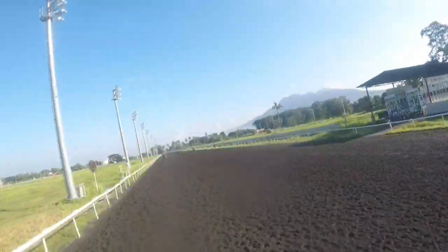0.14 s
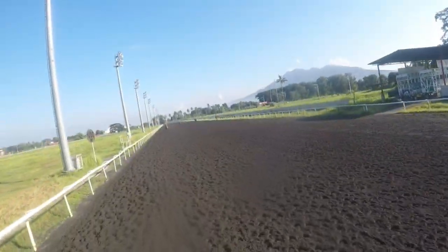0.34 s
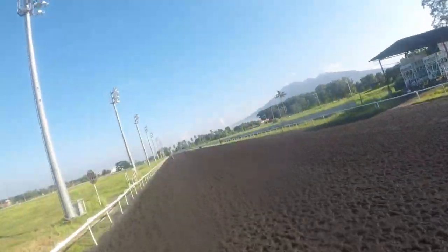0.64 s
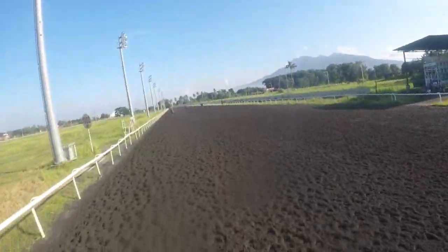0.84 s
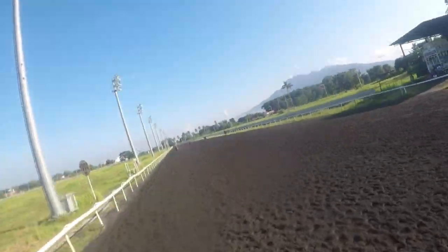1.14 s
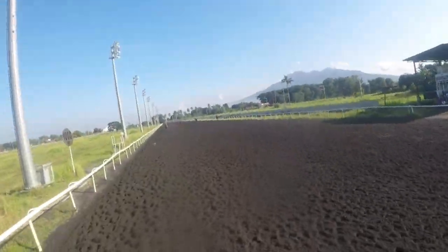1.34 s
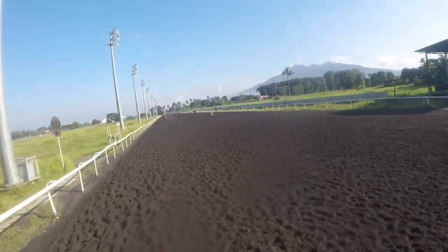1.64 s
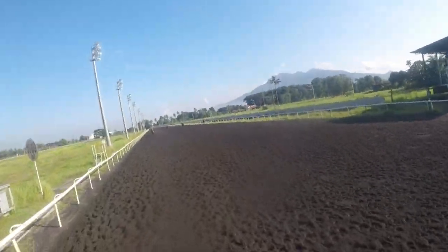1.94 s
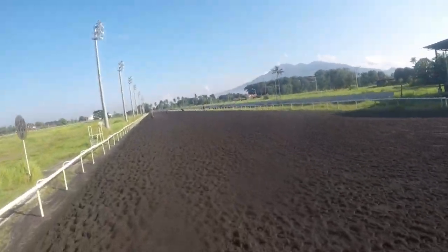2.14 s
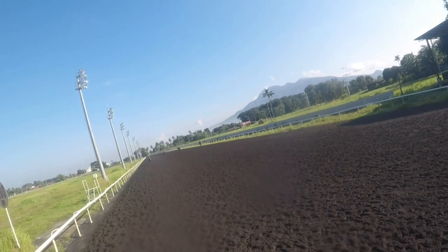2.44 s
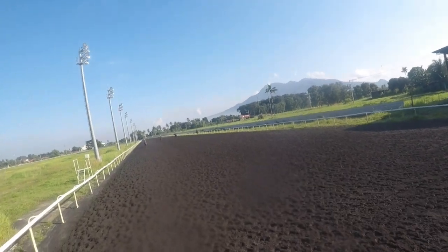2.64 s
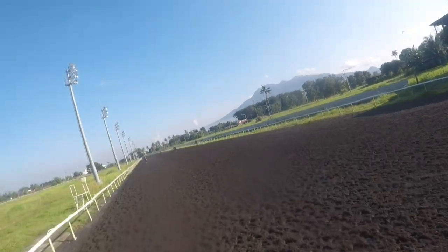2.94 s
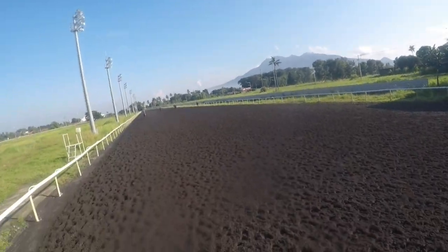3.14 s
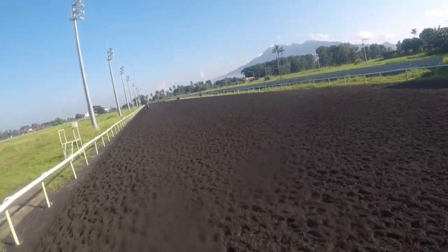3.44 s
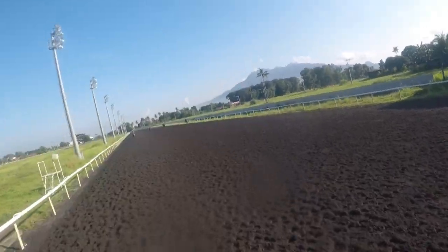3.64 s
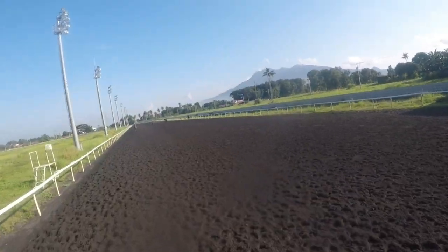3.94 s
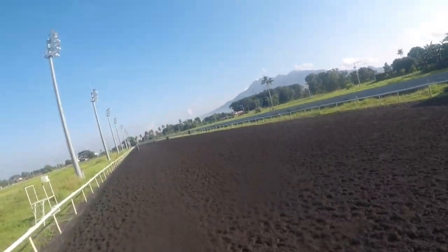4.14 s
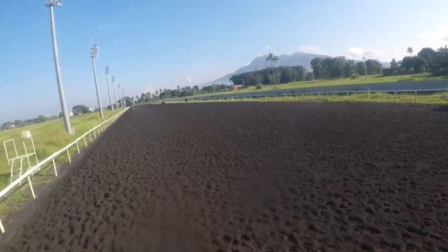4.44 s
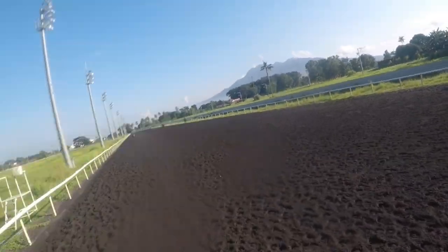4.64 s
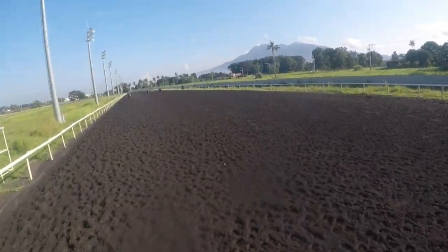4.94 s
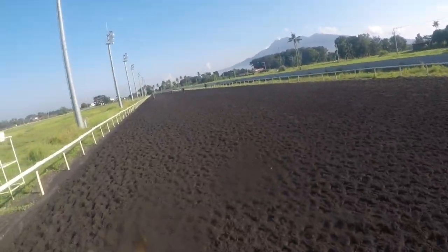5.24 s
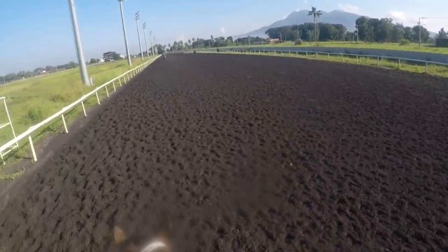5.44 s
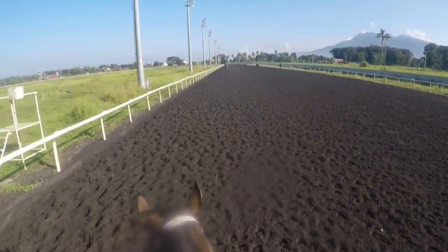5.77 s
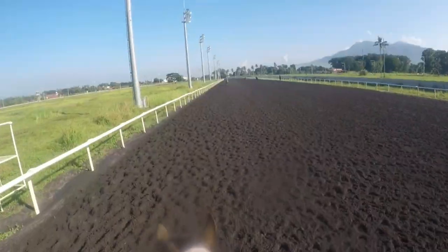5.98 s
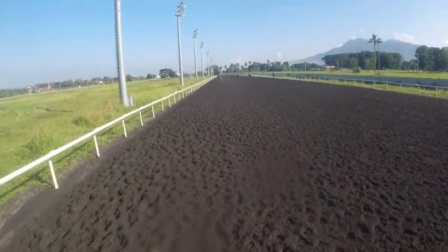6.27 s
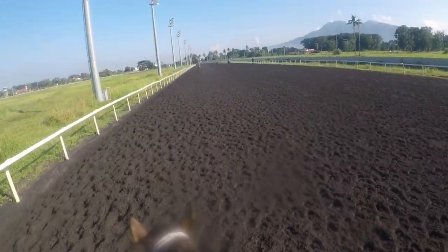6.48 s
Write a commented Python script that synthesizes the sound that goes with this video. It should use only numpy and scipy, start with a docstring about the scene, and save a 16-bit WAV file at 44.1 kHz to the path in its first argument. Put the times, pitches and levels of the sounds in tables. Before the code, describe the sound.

A rider's loose camera mount knocks and clacks once per galloping stride, over rushing, buffeting wind and faint dull hoof thuds on soft dirt.

```python
"""Hard clacks over a galloping rush of air: a loose camera mount on a racehorse's rider lurches once a stride.
Each lurch chains sway, grit, bump and judder, narrow tones swelling into the clack, clack, housing ring,
settling rattle and wobble, made from shaped impulses, random grains, resonances and swept sines.
Between them come light taps, small bright clicks, dull hoof thuds on soft dirt (filtered grains)
and wind on the microphone (filtered noise); a slow limiter ducks the mix after loud knocks."""
import sys
import numpy as np
from scipy import signal
from scipy.io import wavfile
from scipy.ndimage import uniform_filter1d, minimum_filter1d, map_coordinates

SR = 44100
rng = np.random.default_rng(int(sys.argv[2]) if len(sys.argv) > 2 else 0)


def wrap_up_sound(samples):
    """Save the sound to the file named by the first command line argument, as 16-bit audio."""
    columns = np.atleast_2d(samples).T
    # keep every value between -1 and 1, then stretch to whole-number steps
    tamed = np.clip(columns, -1, 1)
    steps = np.round(tamed * 32767).astype(np.int16)
    wavfile.write(sys.argv[1], SR, steps)


N = 291501
TIME_S = np.arange(N) / SR

# mount lurches, one a stride: bump_s, clack_s, sway_db, bump_db, judder_db, judder_hz,
# clack_force_db, low_tone_hz, wobble_db
LURCHES = [(0.0281, .0593, -9.5, -13, -11, 126.2, 1.5, 1524, -1.5),
           (0.5828, .622, -14, -19.5, -14, 149.4, -2, 1508, -8),
           (1.1804, 1.2149, -14.5, -14.5, -18.5, 116.4, 2.5, 1461, 0.5),
           (1.754, 1.7882, -17, -18.5, -12.5, 152.6, -1, 1502, -11),
           (2.3525, 2.386, -17, -16.5, -11.5, 123.2, 2, 1460, -5),
           (2.947, 2.9838, -11.5, -12, -11, 105.1, 5, 1506, 2.5),
           (3.5376, 3.5748, -16, -16.5, -16, 149.9, 1.5, 1509, -0.5),
           (4.1153, 4.1517, -19.5, -14.5, -8, 137.5, .5, 1514, -5.5),
           (4.7022, 4.735, -14.5, -15.5, -8, 150.1, 1, 1465, -1.5),
           (5.292, 5.3237, -20, -19, -17.5, 164.7, -3, 1502, -10.5),
           (5.6987, 5.7278, -14, -28.5, -13.5, 143.7, -3.5, 1559, -8.5),
           (5.9236, 5.962, -12, -17, -11.5, 143.1, 0.5, 1484, -5)]
# spectrum of the soft knock: hz, relative_db
KNOCK_SPECTRUM = [(40, -7.5), (150, -0.5), (280, 0.5), (420, -7), (560, -4), (720, -18), (1000, -18.5),
                  (1250, -26), (1600, -20), (1900, -28.5), (2400, -39.5), (4000, -79.5)]
# spectrum of the gritty joint: hz, relative_db
GRIT_SPECTRUM = [(600, -13), (1600, 13.5), (2200, -3.5), (2800, 1), (3550, -13.5), (4150, -3),
                 (5100, -16.5), (6000, -16.5), (7000, -21.5), (9500, -26.5), (12000, -46), (16000, -58)]


def amp(db):
    """Decibels to amplitude gain."""
    return 10 ** (np.asarray(db) / 20)


def leveled(x, db, seconds):
    """Scales x so that its energy, spread over this many seconds, has the level db."""
    return x * amp(db) * np.sqrt(seconds * SR / (np.sum(x ** 2) + 1e-20))


def add(mix, start_s, sound):
    """Mixes a sound in at start_s, cropped to the mix."""
    start = round(start_s * SR)
    sound = sound[max(-start, 0):]
    part = mix[max(start, 0):][:len(sound)]
    part += sound[:len(part)]


def colour(x, points, tilt_db_per_octave=0, size=4096):
    """Minimum-phase filter with the given spectrum, tilted."""
    hz, db = np.transpose(points)
    octave = np.log2(abs(np.fft.fftfreq(size, 1 / SR)) + 1)
    gain_db = np.interp(octave, np.log2(hz), db) + tilt_db_per_octave * octave
    log_gain = np.log(amp(gain_db))
    # the Hilbert transform of the log gain gives the causal phase
    impulse_response = np.fft.ifft(np.exp(np.conj(signal.hilbert(log_gain)))).real
    return signal.fftconvolve(x, impulse_response)[:len(x)]


def resonate(x, hz, width_hz):
    """Two equal resonances in series: a peak with steep skirts."""
    b, a = signal.iirpeak(hz, hz / width_hz, SR)
    return signal.lfilter(b, a, signal.lfilter(b, a, x))


def wander(rate_hz, count):
    """Smooth random curve through unit-spread knots, rate_hz knots a second."""
    knots = rng.standard_normal(8192)
    return map_coordinates(knots, [np.arange(count) * rate_hz / SR], order=2, mode="wrap")


def grains(t, per_s, spread_db):
    """Random one-sample clicks of uneven size and random sign at the sample times t."""
    chance = rng.random(len(t))
    size = np.clip(rng.standard_normal(len(t)), -2, 2)
    sign = rng.choice([-1, 1], len(t))
    return (chance < per_s / SR) * sign * amp(spread_db * size)


def blow(count=12000):
    """One sharp contact: time axis and unit impulse."""
    t = np.arange(count) / SR
    return t, 1. * (t == 0)


def breeze(s):
    """Slow strength of the ride's rush at time s, in dB."""
    # wind strength: time_s, strength_db
    strength = [(0, 5.5), (.35, -3.5), (1.1, 0), (1.9, 0), (2.3, 1), (2.85, .5), (3.25, -1.5), (3.6, -1),
                (4.1, -2.5), (4.65, -1), (5.2, -0.3), (5.7, 0.5), (6.08, -5), (6.33, -7.5), (6.6, 1.5)]
    return np.interp(s, *np.transpose(strength))


def wind():
    """Air over the microphone: lumpy buffeting, low roar and fine hiss, swelling with the rider's swings."""
    # spectra: hz, relative_db
    buffet_spectrum = [(8, -0.5), (22, 2.5), (55, -4), (85, -4), (130, -23.5), (250, -47.5), (600, -77)]
    roar_spectrum = [(50, -12.5), (120, 1.5), (180, -2), (300, -2.5), (400, -7), (510, -7.5), (620, -11.5),
                     (780, -17), (1200, -26), (1600, -26), (2200, -38.5), (4000, -52.5)]
    hiss_spectrum = [(400, 2), (1500, 5), (2300, 1.5), (3050, 1.5), (3600, -9), (4200, -3.5), (6200, -6),
                     (6900, -8.5), (8000, -8), (9600, -6), (10600, -8), (11500, -14), (13000, -15),
                     (15500, -34)]
    # buffet, roar, hiss: rest_db, swing_db, breeze_db_per_db, flutter_db, drift_db
    air_layers = [(-46, 18.5, 0.9, 1.5, 1.5), (-52, 11.5, 1.07, 3, -0.36), (-64.5, 7.5, 0.68, 0.6, -0.23)]
    # lull and gust in the buffeting: centre_s, change_db, half_length_s
    gust_events = [(3.303, -9, 0.051), (6.556, 16.5, 0.083)]
    last_swing_s, swing_rise_s, swing_fall_s = 6.418, 0.14, 0.12

    # the rider swings forward into each lurch and once more at the end
    peaks_s = [stop_s for _, stop_s, *_ in LURCHES] + [last_swing_s]
    slopes = [np.minimum((TIME_S - s) / swing_rise_s, (s - TIME_S) / swing_fall_s) for s in peaks_s]
    swing = np.exp(np.max(slopes, axis=0))
    layers = []
    spectra = [buffet_spectrum, roar_spectrum, hiss_spectrum]
    for spectrum, (rest_db, swing_db, follow, flutter_db, drift_db) in zip(spectra, air_layers):
        unsteady_db = flutter_db * wander(35, N) + drift_db * wander(9, N)
        air = colour(rng.standard_normal(N), spectrum) * amp(unsteady_db)
        level_db = rest_db + swing_db * swing + follow * breeze(TIME_S)
        layers.append(leveled(air, level_db, N / SR))
    buffet, roar, hiss = layers
    gusts_db = sum(db * np.exp(-((TIME_S - s) / half_s) ** 2) for s, db, half_s in gust_events)
    return (buffet * amp(gusts_db) + roar + hiss) * signal.windows.tukey(N, .002)


def hooves():
    """Each hoof crushes loose clods: a dull cluster of grains; light footfalls follow the gait."""
    # heaviest falls: start_s, level_db, length_s, tilt_db_per_octave
    heavy = [(.207, -44, 0.04, -1.5), (.755, -52, 0.068, 2), (1.305, -43, 0.055, -1),
             (1.625, -46.5, 0.029, 0.5), (2.192, -45, .032, 1), (2.48, -48.5, .072, 1),
             (3.082, -38, 0.039, 0), (3.684, -42, 0.095, -1), (4.328, -49, 0.049, 2),
             (4.859, -39, 0.038, .5), (5.802, -46, 0.017, 3), (6.011, -42, 0.041, 2.5),
             (6.416, -44, 0.016, 2.5), (6.575, -44, 0.077, 1)]
    # light falls of every stride: delay_after_clack_s, level_db (before breeze), length_s
    gait = [(.11, -57, 0.12), (.175, -51, 0.021), (.4, -60, 0.032)]
    # dirt spectrum: hz, relative_db
    dirt_spectrum = [(60, -29.5), (180, 18), (300, -5.5), (420, 5), (510, 10.5), (640, -7.5), (800, -9.5),
                     (1200, -15.5), (1550, -11.5), (2200, -38.5), (4000, -36.5), (9000, -52)]
    jitter_s = 0.022

    out, t = np.zeros(N), np.arange(12000) / SR
    light = []
    for _, stop_s, *_ in LURCHES:
        for delay_s, db, length_s in gait:
            start_s = stop_s + delay_s + jitter_s * rng.standard_normal()
            light.append((start_s, db + breeze(stop_s + delay_s), length_s, 0))
    for start_s, db, length_s, tilt in [*heavy, *light]:
        pressure = (1 - np.exp(-t / 0.0025)) * np.exp(-(t / length_s) ** 2)
        crush = grains(t, 1500, 1.7) * pressure
        add(out, start_s, leveled(colour(crush, dirt_spectrum, tilt), db, 2.07 * length_s))
    return out


def bright_clicks():
    """Small bright clicks, most of them just before a bump of the mount: grains in one resonance."""
    # start_s, level_db, resonance_hz, t60_s
    events = [(0.578, -48, 5820, .01), (2.933, -56, 8000, .015), (4.1075, -45, 4340, .012),
              (4.692, -49.5, 4440, .011), (5.282, -57, 3040, .034), (5.389, -58, 4550, .046),
              (5.622, -54, 4500, .035)]
    out = np.zeros(N)
    for start_s, db, hz, t60_s in events:
        t, first = blow()
        contacts = first + grains(t, 4800, 5.5) * amp(-12.5 - 60 * t / t60_s)
        add(out, start_s, leveled(resonate(contacts, hz, 700) + 0.057 * contacts, db, 0.0031))
    return out


def housing(force):
    """The hollow case rings on after a force; random mode gains and detuning vary each blow."""
    # modes: hz, level_db, t60_s
    modes = [(388, -32.5, 0.15), (517.4, -22, 0.099), (679, -21, 0.048), (866, -29.5, 0.024),
             (1113, -34, 0.13), (1500, -29.5, 0.091), (1560, -22, 0.057), (1795, -28, 0.05),
             (2030, -46, .045), (3890, -45.5, 0.039)]
    t = np.arange(len(force)) / SR
    ring = np.zeros(len(force))
    for hz, db, t60_s in modes:
        luck, detune = rng.standard_normal(2)
        decay = amp(db + 3.6 * luck - 60 * t / t60_s)
        ring += decay * np.sin(2 * np.pi * hz * (1 + 0.013 * detune) * t)
    return signal.fftconvolve(force, ring)[:len(force)]


def taps():
    """Between lurches the mount touches its stop lightly, and the housing rings a little."""
    # start_s, level_db, tilt_db_per_octave
    touches = [(.132, -33.5, -2.5), (1.669, -48.5, -3), (2.8, -44.5, -4.5), (4.058, -47.5, -4),
               (5.7681, -29, -.5), (6.372, -41, -1.5)]
    # tap spectrum: hz, relative_db
    tap_spectrum = [(100, 2), (400, 12.5), (700, 4), (1000, 4.5), (1250, -5), (1600, 6), (2000, -8.5),
                    (2800, -20), (3500, -30.5), (4300, -25), (6000, -37.5), (12000, -65)]
    chatter_s, ring_db = 0.0063, -4.5
    out = np.zeros(N)
    for start_s, db, tilt in touches:
        t, first = blow()
        chatter = leveled(grains(t, 3000, 2.8) * np.exp(-(t / chatter_s) ** 2), 0, 1 / SR)
        contact = leveled(colour(first + chatter, tap_spectrum, tilt), db, 0.047)
        add(out, start_s, contact + amp(db + ring_db) * housing(first))
    return out


def sway(db):
    """A slow, uneven heave of the mount builds up and quickens towards the bump at t = 0."""
    t = np.arange(-.15, .06, 1 / SR)
    hz = np.interp(t, [-.05, .01], [28, 54]) * np.exp(0.358 * wander(70, len(t)))
    swell = np.exp(np.minimum((t + 0.011) / 0.022, -(t + 0.0092) / 0.014))
    return t[0], leveled(swell * np.sin(2 * np.pi * np.cumsum(hz) / SR), db, 0.034)


def grit(db):
    """Separate crisp clicks of the joint around the bump, over a finer crackle."""
    t = np.arange(-.05, .08, 1 / SR)
    pressure = np.exp(np.minimum(t / 0.0071, -t / 0.012))
    crackle = leveled(grains(t, 2700, 2.7) * pressure, -0.5, 1 / SR)
    clicks = leveled(grains(t, 430, 7) * pressure, -1.3, 1 / SR)
    contact = 0.48 * np.diff(1. * (t >= 0), prepend=0)
    return t[0], leveled(colour(crackle + clicks + contact, GRIT_SPECTRUM), db, 0.036)


def bump(slide_s, knock_db, knock_hz, judder_db, judder_hz):
    """The pads crumple into a soft knock, then the mount judders unevenly along its slide."""
    t = np.arange(-.03, .2, 1 / SR)
    first = np.diff(1. * (t >= 0), prepend=0)
    turns = np.cumsum(judder_hz * np.exp(0.2467 * wander(168.9, len(t)))) / SR
    # one slip per judder cycle
    slips = np.diff(np.floor(turns), prepend=0) * (t > 0) * (t < slide_s) * np.exp(-t / 0.069)
    crumple = np.exp(np.minimum(t / 0.0026, -(t / 0.017) ** 2))
    rattle = leveled(grains(t, 1500, 2.5) * crumple, 6.8, 1 / SR)
    force = 0.73 * first + 0.78 * slips + rattle
    body = colour(force, KNOCK_SPECTRUM)
    knock = leveled(body + 0.63 * resonate(body, knock_hz, 360), knock_db, 0.049)
    sliding = np.sin(np.pi * np.clip((t + 0.004) / (slide_s + 0.023), 0, 1)) ** .5
    # strong and weak slips alternate: a boom an octave down
    shake = np.cos(2 * np.pi * turns) + 1.14 * np.cos(np.pi * turns)
    judder = leveled(sliding * shake, judder_db, slide_s)
    return t[0], knock + judder + amp(knock_db - 12.5) * housing(force)


def clack_tones(db, low_hz):
    """Narrow 1.5 kHz and 4.1 kHz tones swell into the clack at t = 0 and fade after it, over a rasp."""
    # rasp resonances: hz, width_hz, level_db (before the final levelling)
    rasp_modes = [(843, 380, -0.5), (1796, 91, -12.5), (2490, 600, -31), (5150, 1100, -25.5)]
    t = np.arange(-.07, .05, 1 / SR)
    rise = (np.exp(-abs(t) / 0.0042) + 0.13 * np.exp(-abs(t) / 0.018)) * (t < 0)
    rasp_grains = grains(t, 4000, 5.7) * rise
    rasp = sum(leveled(resonate(rasp_grains, hz, width_hz), mode_db, 0.81)
               for hz, width_hz, mode_db in rasp_modes)
    # the low tone wavers in pitch
    low_turns = np.cumsum(low_hz * np.exp(0.0716 * wander(449.2, len(t)))) / SR
    low_swell = rise + (t >= 0) * np.exp(-abs(t) / 0.0056)
    low_tone = leveled(low_swell * np.sin(2 * np.pi * low_turns), 2.6, 1)
    high_turns = np.cumsum(4070 + 55 * wander(150, len(t))) / SR
    high_swell = np.exp(np.minimum(t / 0.0087, -t / 0.0065))
    high_tone = leveled(high_swell * np.sin(2 * np.pi * high_turns), -19, 0.87)
    return t[0], leveled(low_tone + rasp + high_tone, db, 0.016)


def clack(thump_db, snap_db, rebound_s):
    """The mount strikes its stop and rebounds against the other side of its play."""
    # spectra: hz, relative_db
    thump_spectrum = [(30, -10), (100, 12), (160, 11.5), (260, 0.5), (380, 7.5), (520, -0.5), (740, -3),
                      (950, -31), (1250, -25), (1530, -15), (1800, -14.5), (2200, -27.5), (4000, -97)]
    snap_spectrum = [(700, -34.5), (1600, 5.5), (2200, 8), (2700, 10), (3150, -4), (3600, -13.5),
                     (4150, 5.5), (4500, 3), (5000, -24.5), (6100, -27), (7000, -36), (9500, -36),
                     (12000, -47.5), (16000, -26)]
    t, first = blow()
    second = np.roll(first, round(rebound_s * SR))
    thump = leveled(colour(first - 2.0 * second, thump_spectrum), thump_db, 0.024)
    scrape = leveled(grains(t, 8200, 18) * np.exp(-t / 0.00088), -1.5, 1 / SR)
    snap = leveled(colour(first + 0.11 * second + scrape, snap_spectrum), snap_db, 0.038)
    return snap - thump + amp(thump_db + 4) * housing(first)


def settle(db):
    """After the clack the mount chatters briefly against its pads: dull rattle, crisp top."""
    t, _ = blow()
    chatter = grains(t, 2500, 3.4) * np.exp(-t / 0.0082)
    rattle = leveled(colour(chatter, KNOCK_SPECTRUM, 1.5), db, 0.032)
    crisp = leveled(colour(chatter * np.exp(-t / 0.0065), GRIT_SPECTRUM, 0.5), db - 26, 0.024)
    return rattle + crisp


def wobble(db, t60_s):
    """The camera's mass swings on its springy mount after the clack, until dry friction stops it."""
    t = np.arange(-.03, .3, 1 / SR)
    friction = np.exp(-(np.maximum(t, 0) / 0.085) ** 4)
    swell = np.minimum(np.exp(t / 0.0087), amp(-60 * t / t60_s)) * friction
    overtone = 0.5 * np.exp(-abs(t) / 0.016) * np.sin(2 * np.pi * 142 * t) * (t > 0)
    return t[0], amp(db) * (swell * np.cos(2 * np.pi * 54 * t) + overtone)


def mount():
    """Every stride throws the camera through the same chain of sounds; harder clacks are mostly brighter."""
    # levels at force 0 dB; thump_share is the part of the force, in dB, that reaches the thump
    thump_base_db, snap_base_db, tones_base_db, settle_base_db, thump_share = -7, -37, -21, -19, 0.26
    # grit level at the usual bump level; it follows the bump dB for dB
    grit_base_db, usual_bump_db = -39.5, -16
    rebound_median_s, sway_lag_s, wobble_lag_s = 0.003224, 0.0055, 0.0096

    out = np.zeros(N)
    for (start_s, stop_s, sway_db, bump_db, judder_db, judder_hz,
         force_db, low_tone_hz, wobble_db) in LURCHES:
        rebound_s = rebound_median_s * np.exp(0.081 * rng.standard_normal())
        thump_db = thump_base_db + thump_share * force_db
        add(out, stop_s, clack(thump_db, snap_base_db + force_db, rebound_s))
        add(out, stop_s, settle(settle_base_db + force_db))
        grit_db = grit_base_db + bump_db - usual_bump_db
        # each part returns its lead time (negative) and its sound
        parts = [(start_s + sway_lag_s, sway(sway_db)),
                 (start_s, grit(grit_db)),
                 (start_s, bump(stop_s - start_s, bump_db, 425, judder_db, judder_hz)),
                 (stop_s, clack_tones(tones_base_db + force_db, low_tone_hz))]
        for at_s, (lead_s, sound) in parts:
            add(out, at_s + lead_s, sound)
        # the camera recoils from the stop, so its first swing goes the other way
        lead_s, swing = wobble(wobble_db, t60_s=0.21)
        add(out, stop_s + wobble_lag_s + lead_s, -swing)
    return out


def scene():
    """Wind, hooves, bright clicks, taps and mount at one microphone."""
    return (wind() + hooves() + bright_clicks() + taps() + mount())[None]


def record(dry):
    """A look-ahead limiter holds down peaks and recovers slowly; then a low-pass limits the band."""
    ceiling, recovery_db_per_s, cutoff_hz = .95, 55, 15400
    over_db = 20 * np.log10(np.maximum(abs(dry[0]) / ceiling, 1))
    recovery_db = recovery_db_per_s * TIME_S
    held_db = np.maximum.accumulate(over_db + recovery_db) - recovery_db
    # centred windows start the gain drop ahead of the peak
    duck_db = uniform_filter1d(minimum_filter1d(-held_db, size=65), size=65)
    lowpass = signal.firwin(511, cutoff_hz, window=("kaiser", 9), fs=SR)
    return signal.oaconvolve(dry * amp(duck_db), lowpass[None], "same")


dry = scene()
out = record(dry)
wrap_up_sound(out)
```